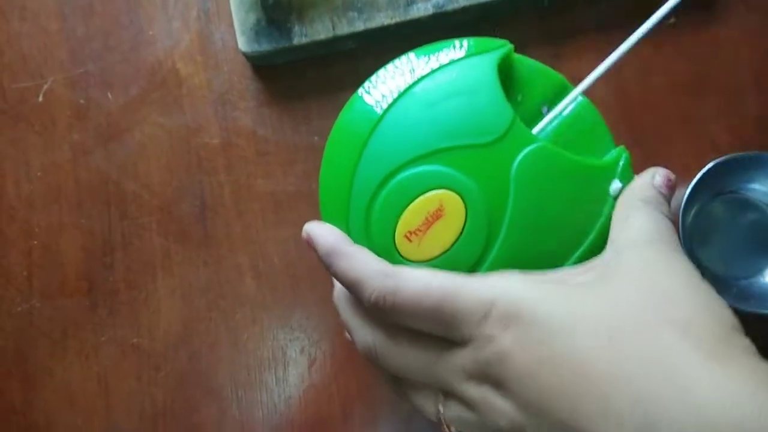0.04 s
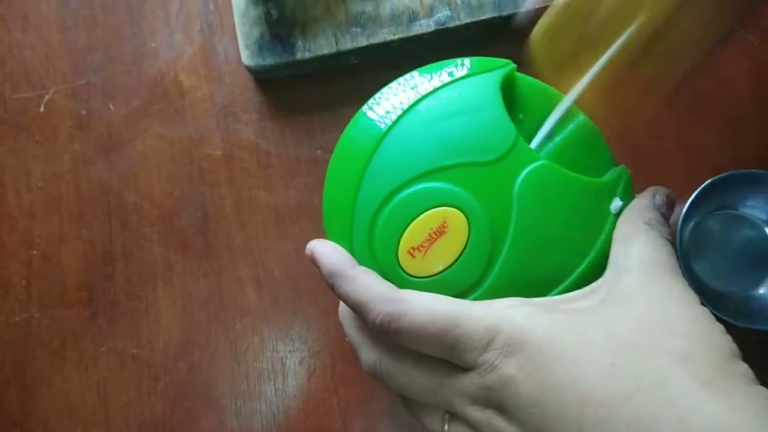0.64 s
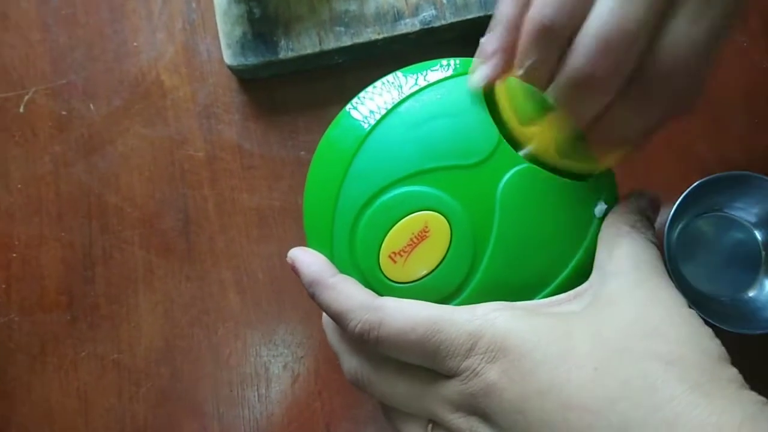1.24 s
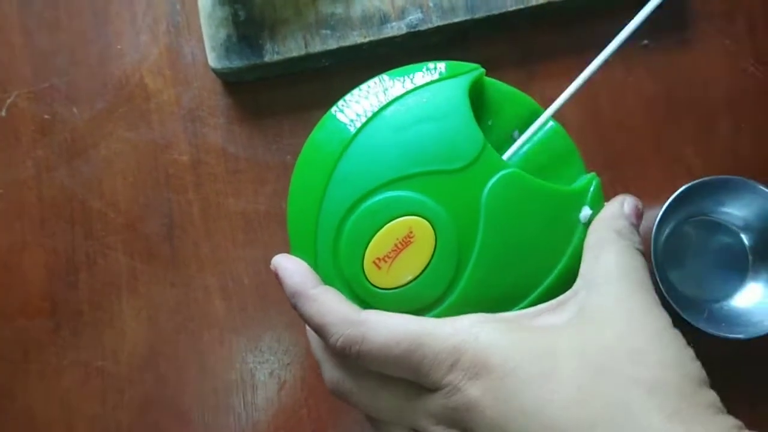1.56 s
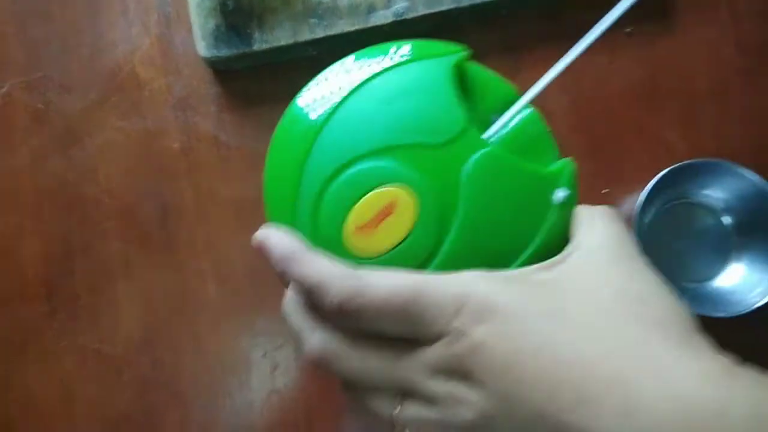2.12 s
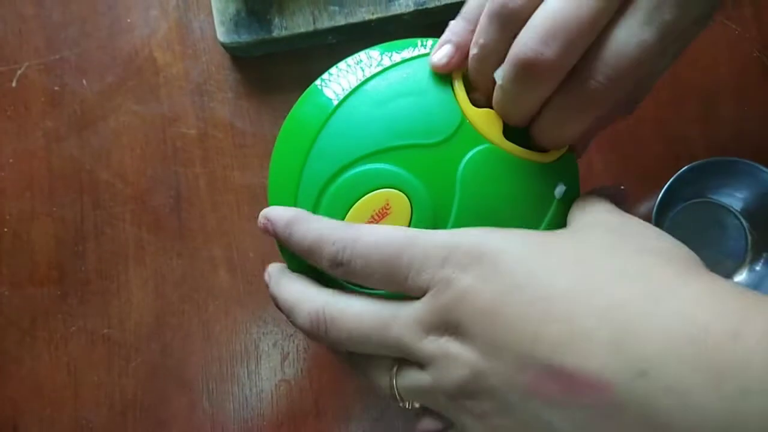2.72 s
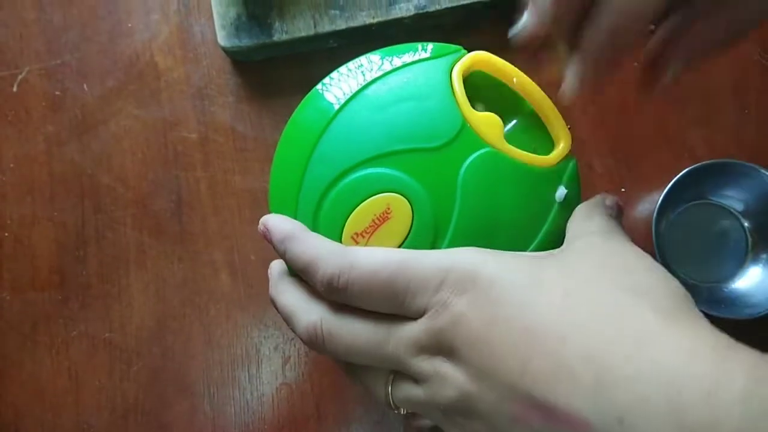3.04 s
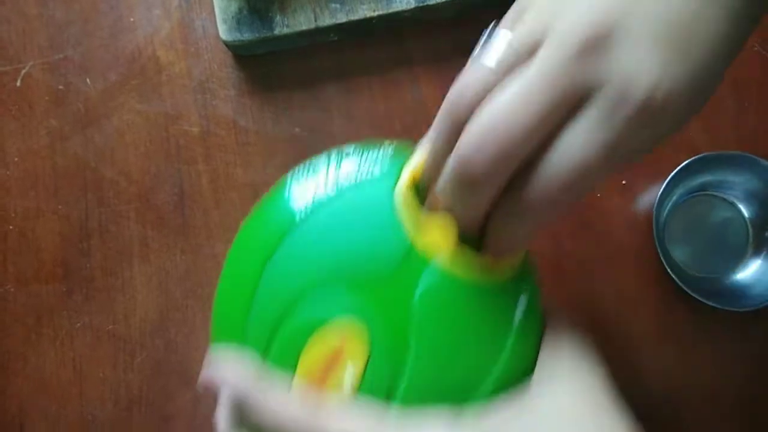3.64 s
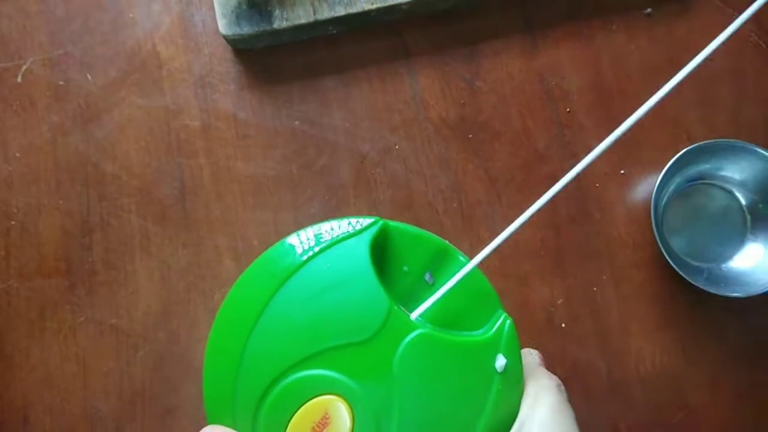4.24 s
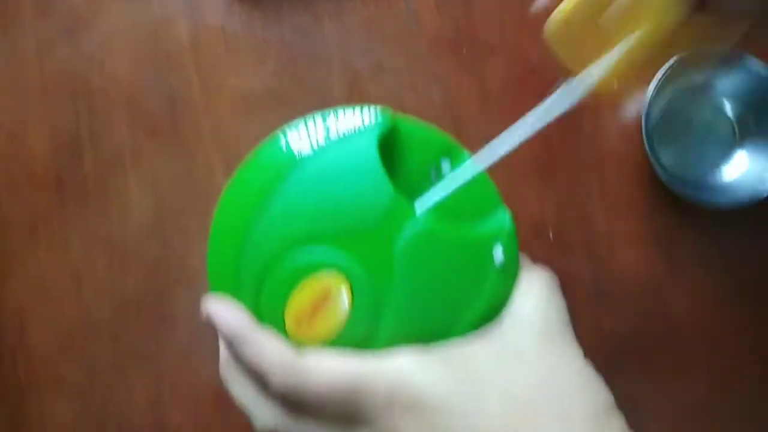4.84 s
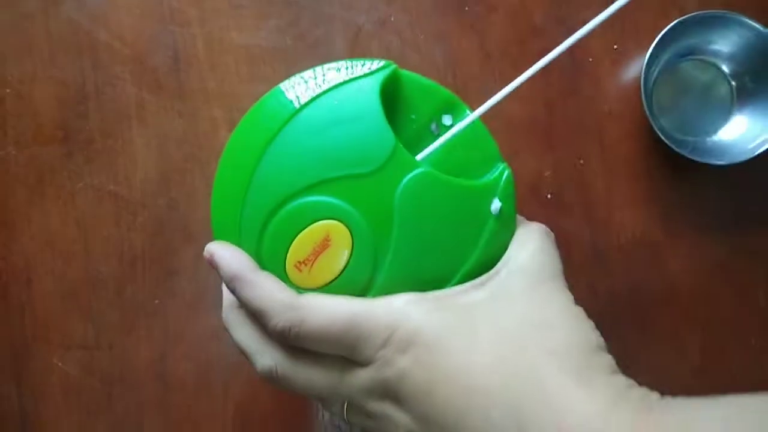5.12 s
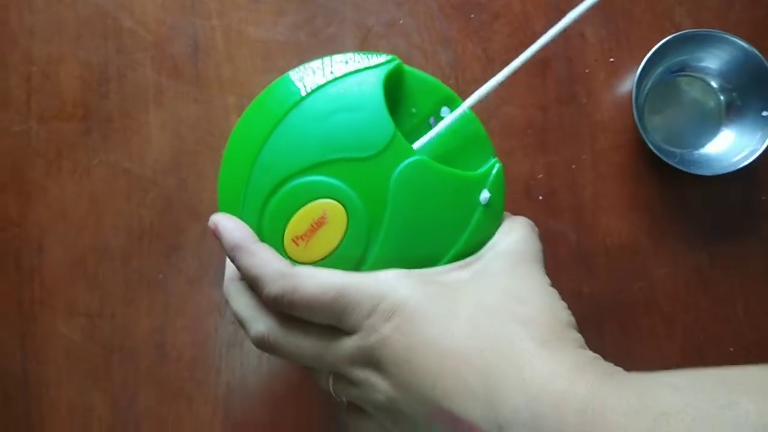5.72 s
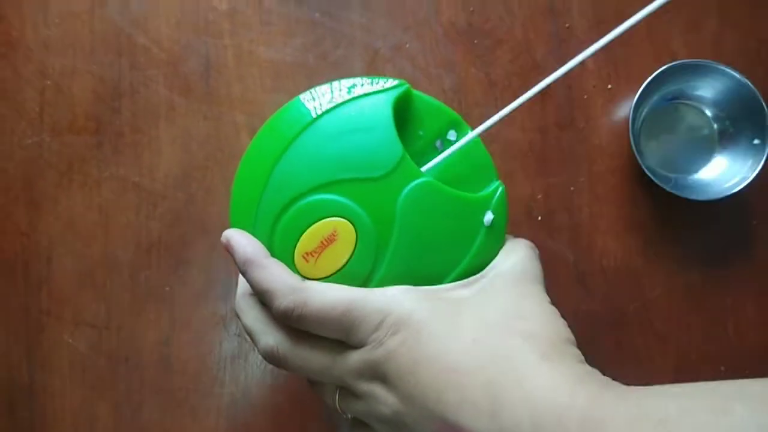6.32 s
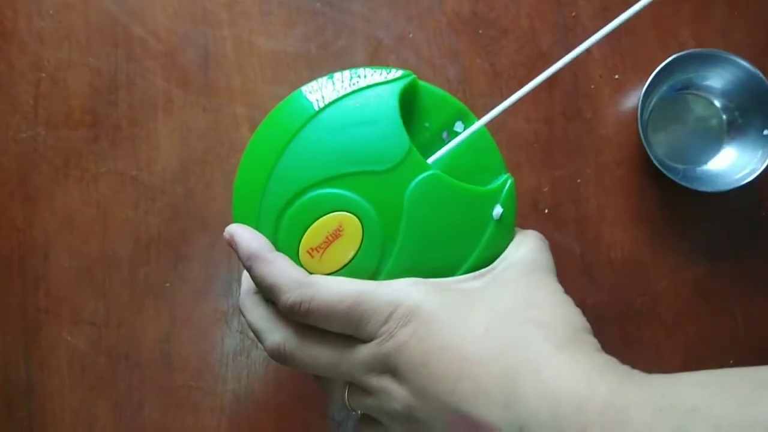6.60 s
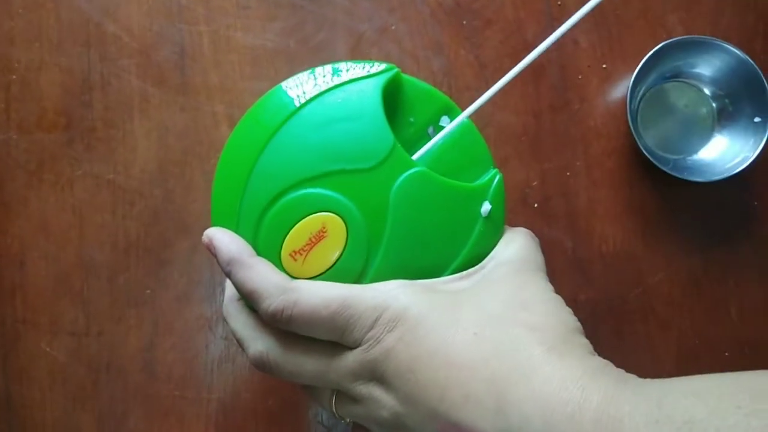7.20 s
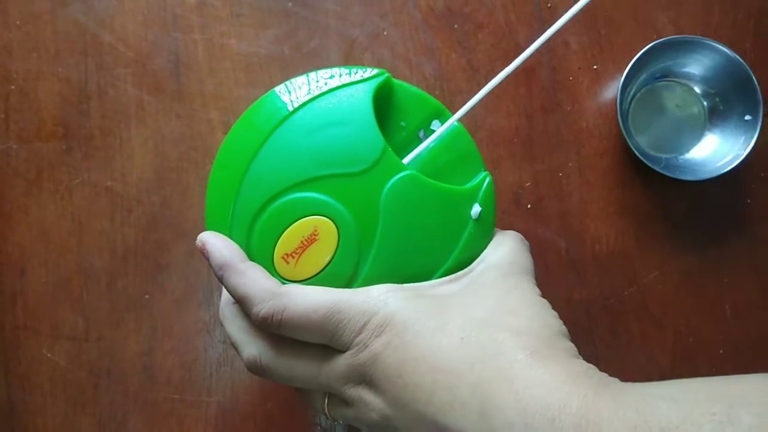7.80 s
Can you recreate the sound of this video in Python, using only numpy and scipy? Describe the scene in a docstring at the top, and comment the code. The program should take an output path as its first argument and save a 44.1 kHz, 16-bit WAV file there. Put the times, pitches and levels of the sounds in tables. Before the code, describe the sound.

Close, repeated pulls of a hand chopper: rattling crunches of vegetables alternate with the cord's raspy rewind, plastic clicks and light table knocks.

```python
"""In a small room, a plastic pull-cord vegetable chopper is worked on a wooden table, close by.
Each pull spins the blades through the vegetables, whose many small impacts crunch and excite the
resonances of the bowl. A spring then winds the cord back with a bright ratchet rasp. Handle, pawl and
lid click in damped free vibration. In a pause fingers touch the handle and the bowl knocks on the table."""
import sys
import numpy as np
from scipy import signal
from scipy.fft import rfft, irfft
from scipy.io import wavfile

SR = 44100
rng = np.random.default_rng(int(sys.argv[2]) if len(sys.argv) > 2 else 0)


def unload_audio(sound):
    """Save the sound as a 16-bit wav file, at the path given as the first command line argument."""
    columns = np.transpose(np.atleast_2d(sound))
    # keep every value between -1 and 1, then stretch to whole-number steps
    steps = np.round(np.clip(columns, -1, 1) * 32767)
    wavfile.write(sys.argv[1], SR, steps.astype(np.int16))


N = 351036
TIME = np.arange(N) / SR

# rewinds of the cord: t/s, spin-up/s, delay until braking/s, braking/s, rattle/dB, rasp/dB, pawl click/dB
REWIND_STROKES = [(0.055, .02, 0.14, 0.039, -24, -18.5, -10), (.57, .04, .135, 0.096, -24.5, -17.5, -15.5),
                  (1.103, 0.046, .135, .1, -24.5, -18.5, -17.5),
                  (1.631, 0.046, .14, 0.068, -24.5, -18, -16), (2.415, .16, .19, 0.15, -27.5, -23.5, -27),
                  (4.426, .05, 0.15, 0.11, -26, -19.5, -17), (5.22, .02, .15, .105, -27, -21, -14),
                  (5.899, .075, .175, 0.11, -24, -18, -16.5), (6.607, .055, .195, 0.081, -25, -18, -16.5),
                  (7.279, 0.063, 0.16, .11, -25, -18, -15), (7.912, .03, 0.17, .11, -25.5, -18.5, -20)]
# resonances of the filled bowl: f/Hz, bandwidth/Hz, lift/dB
BOWL_RESONANCES = [(176, 30, 8.5), (209, 54, -5), (259.4, 52, 6), (370, 70, 5), (435, 30, 0.5),
                   (489, 8.9, 8), (626, 280, 3), (1250, 73, 0.5), (1822, 67, 2)]
# modes of the plastic lid: f/Hz, level/dB, t60/s
LID_MODES = [(459, -8.5, 0.044), (741, -5, 0.033), (1230, -7.5, 0.037), (1810, -9, 0.026),
             (2180, -3.5, 0.017), (2740, -11.5, 0.0034), (3450, -5, 0.0075), (4090, -24, .009)]
# stereo balance of chopping and handling: f/Hz, left minus right/dB
PULL_BALANCE = [(100, -0.5), (250, 1.5), (400, 1), (700, -1.5), (1400, -4), (2500, -7), (4400, -2),
                (8000, -2.5), (12000, 6.5), (15000, 0)]
# stereo balance of rewinds and clicks: f/Hz, left minus right/dB
REWIND_BALANCE = [(100, -3.5), (330, 2.5), (700, -1.5), (1400, -4.5), (2500, -4.5), (4400, -2),
                  (6500, -0.5), (8400, -5), (11500, 5), (15000, 6)]


def undb(db):
    """Amplitude ratio of a level in decibels."""
    return 10 ** (np.asarray(db) / 20)


def unit(x):
    """Normalisation to an rms of one."""
    return x / np.sqrt(np.mean(x ** 2))


def convolve(x, response):
    """Convolution: the output of a linear system with this impulse response."""
    return signal.oaconvolve(x, response)[:len(x)]


def band(x, lo_hz, hi_hz, order=3):
    """Butterworth band-pass."""
    edges = [lo_hz, min(hi_hz, SR / 2 - 1)]
    return signal.sosfilt(signal.butter(order, edges, "band", fs=SR, output="sos"), x)


def colour(x, spectrum, resonances=(), size=8192):
    """Minimum-phase filter through (f/Hz, level/dB) points, with resonance peaks on top."""
    hz = np.maximum(np.fft.rfftfreq(size, 1 / SR), 1)
    points_hz, points_db = np.transpose(spectrum)
    db = np.interp(np.log(hz), np.log(points_hz), points_db)
    for centre, width, lift in resonances:
        db = db + lift / (1 + (2 * (hz - centre) / width) ** 2)
    cepstrum = irfft(np.log(undb(db)))
    cepstrum[1:size // 2] *= 2  # folding the cepstrum makes the response causal
    cepstrum[size // 2 + 1:] = 0
    return convolve(x, irfft(np.exp(rfft(cepstrum)))[:size // 2])


def fade(t60):
    """Exponential decay, lasting until it is 60 dB down."""
    return np.exp(-np.log(1000) * np.arange(int(t60 * SR) + 2) / (t60 * SR))


def diffuse(t60):
    """Diffuse response: dense random arrivals, decaying, of unit energy."""
    decay = fade(t60)
    tail = decay * rng.standard_normal(SR)[:len(decay)]
    return tail / np.linalg.norm(tail)


def ping(hz, t60):
    """Free vibration of one damped mode."""
    decay = fade(t60)
    return decay * np.sin(2 * np.pi * hz * TIME[:len(decay)])


def ring(modes, detune):
    """Modal sum of a struck object, with a peak of one; the pitches vary from blow to blow."""
    out = np.zeros(SR // 2)
    for hz, db, t60 in modes:
        decay = fade(t60)[:len(out)]
        detuned_hz = hz * (1 + detune * rng.standard_normal())
        out[:len(decay)] += undb(db) * decay * np.cos(2 * np.pi * detuned_hz * TIME[:len(decay)])
    return out / np.abs(out).max()


def add(track, start, sound):
    """Superposition of a sound on a track at a time in seconds."""
    i = max(int(start * SR), 0)
    track[i:i + len(sound)] += sound[:N - i]


def wander(per_second):
    """Random modulation, interpolated between knots, with an rms of one."""
    knots = rng.standard_normal(4000)
    return unit(np.interp(TIME * per_second, np.arange(len(knots)), knots))


def grains(per_second, spread_db):
    """Shot noise: independent tiny impacts of unequal size."""
    hit = rng.random(N) < per_second / SR
    size = undb(spread_db * np.clip(rng.standard_normal(N), -2, 2))
    return unit(hit * size * rng.choice([-1, 1], N))


def teeth(hz, jitter, spread_db):
    """Quasi-periodic impulse train: one impulse per passing tooth or blade, uneven in time and size."""
    stretch, size = rng.standard_normal((2, N))
    at = np.flatnonzero(np.diff(np.floor(np.cumsum(hz) / SR)))
    late = jitter * stretch[:len(at)] * SR / hz[at]
    out = np.zeros(N)
    out[np.clip(at + late.astype(int), 0, N - 1)] = undb(spread_db * np.clip(size[:len(at)], -2, 1))
    return out


def microphones(x, balance, scatter_t60, scatter_db):
    """Decorrelation: sound from shifting contacts scatters off table and hands, widening the treble."""
    # stereo width: f/Hz, side gain/dB
    width = [(40, 3.5), (140, -13.5), (350, -13), (700, -5.5), (1400, 0.5), (4000, 1.5), (16000, 2.5)]
    near, across, around = (convolve(x * wander(70), diffuse(scatter_t60)) for _ in range(3))
    mid = x + undb(scatter_db) * band(near, 1600, 18000, order=1)
    side = colour((across + around) / np.sqrt(2), width)
    return np.array([colour(mid + sign * side, [(hz, sign * db / 2) for hz, db in balance], size=512)
                     for sign in (1, -1)])


def air():
    """Ambient noise: faint, steady and partly coherent between the two channels."""
    # spectrum of the room's noise: f/Hz, level/dB
    spectrum = [(18, -40.5), (60, -18.5), (110, -20.5), (174, -3), (240, -8), (330, -20.5), (700, -15),
                (1300, -21.5), (3200, -26.5), (6000, -30.5), (11100, -25.5), (16000, -36.5)]
    shared, left, right = (unit(colour(rng.standard_normal(N), spectrum)) for _ in range(3))
    return undb(-71.5) * (0.76 * shared + .6 * np.array([left, right]))


def pull_envelopes():
    """Power laws: drumming and crunch follow the blade speed, which surges and sinks to a coast."""
    # pulls of the cord: t/s, speeding up/s, slowing down/s, drumming/dB, crunch/dB
    pulls = [(-.2, .12, 0.13, -22.5, -21), (0.308, 0.13, .12, -22, -20), (.855, 0.085, .17, -22, -20.5),
             (1.379, .115, 0.12, -21, -19), (2.05, 0.12, .145, -27, -23.5),
             (4.085, .175, 0.14, -24.5, -23.5), (4.865, .165, .15, -24.5, -24.5),
             (5.562, .16, .145, -22, -20), (6.28, 0.17, 0.12, -23.5, -21), (6.975, .16, .11, -24, -21),
             (7.599, 0.16, 0.12, -23, -21)]
    take_up_s, coast_s, coast_share = 0.023, .1, 0.16
    drum, crunch = np.zeros((2, N))
    for start, rise, fall, drum_db, crunch_db in pulls:
        end = start + rise + fall
        effort = np.sin(np.interp(TIME, [start, start + rise, end], [0, np.pi / 2, 0])) ** 1.3
        turning = np.interp(TIME, [start - take_up_s, start, end, end + coast_s], [0, 1, 1, 0])
        speed = turning * (coast_share + (1 - coast_share) * effort)
        drum += undb(drum_db) * speed ** .8
        crunch += undb(crunch_db) * speed ** 1.105
    return drum, crunch


def pieces(lo_hz, hi_hz, t60, spread_db, count=1100):
    """Impact excitation: hard pieces hit blades and wall, each ringing briefly at its own pitch."""
    track = np.zeros(N)
    for when, pitch, size in rng.random((count, 3)):
        hz = lo_hz * (hi_hz / lo_hz) ** pitch
        add(track, when * TIME[-1], undb(spread_db * size ** 2) * ping(hz, t60))
    return unit(track)


def chopping():
    """Source and filter: each blade pass is a cluster of cuts, and flung pieces drum on the bowl."""
    # spectrum of the chopping: f/Hz, level/dB
    spectrum = [(18, -63.5), (30, -37), (98, -17.5), (165, -1), (210, 0.5), (245, 0.5), (355, -1.5),
                (512, -3.5), (1810, -6.5), (2610, -13), (3220, -11), (5590, -18), (6720, -15),
                (12000, -18.5), (16000, -30)]
    drum, crunch = pull_envelopes()
    speed = np.sqrt(drum / drum.max())
    passes = unit(convolve(teeth(40 + 70 * speed, jitter=0.34, spread_db=1), fade(0.047)))
    cuts = unit(grains(per_second=900 + 2000 * speed, spread_db=-1.5) * (0.99 + .5 * passes))
    wet_hiss = grains(per_second=6300, spread_db=0.5)
    thuds = grains(per_second=600 + 700 * speed, spread_db=2.0)
    body = unit(band(colour(thuds, spectrum, BOWL_RESONANCES), 28, 800))
    cutting = band(colour(cuts, spectrum, BOWL_RESONANCES), 800, 4400)
    cutting += undb(-1.5) * band(colour(wet_hiss, spectrum), 4800, 18000)
    hits = pieces(lo_hz=800, hi_hz=2817, t60=0.009, spread_db=17)
    dry = undb(-0.8) * drum * body + crunch * (undb(-4.5) * unit(cutting) + undb(-11.0) * hits)
    return microphones(dry, PULL_BALANCE, scatter_t60=0.005, scatter_db=-3.5)


def rewind_envelopes():
    """Exponential growth and decay: the spring jerks the spool up to speed, then the hand brakes it."""
    spin_up_db_per_s, rattle_brake_db_per_s, rasp_brake_db_per_s = 85, 98.5, 170
    attack_s, rattle_release_s, rasp_release_s = .003, .03, .012
    rattle, rasp = np.zeros((2, N))
    t = TIME[:SR]
    for start, spin_up, brake_at, brake, rattle_db, rasp_db, _ in REWIND_STROKES:
        running = np.minimum(t / attack_s, 1) * undb(-spin_up_db_per_s * np.maximum(spin_up - t, 0))
        braked_s = np.clip(t - brake_at, 0, brake)
        stopped_s = np.maximum(t - brake_at - brake, 0)
        for track, db, db_per_s, release_s in (
                (rattle, rattle_db, rattle_brake_db_per_s, rattle_release_s),
                (rasp, rasp_db, rasp_brake_db_per_s, rasp_release_s)):
            add(track, start, running * undb(db - db_per_s * braked_s) * np.exp(-stopped_s / release_s))
    return rattle, rasp


def rewinding():
    """Friction and repeated impact: the cord scrapes through the eyelet as the pawl skips its teeth."""
    # spectrum of the rasp: f/Hz, level/dB
    rasp_spectrum = [(2000, -19), (3000, -9), (4100, -4), (4930, -8), (5600, -11.5), (7620, -2), (8700, -1),
                     (9600, -5), (11900, -3.5), (15100, -15), (16000, -15)]
    # resonances of spring and spool: f/Hz, bandwidth/Hz, lift/dB
    spool_resonances = [(5750, 860, 3), (6900, 98, 9), (7900, 220, 0.5), (8630, 640, -0.5), (8650, 250, 1),
                        (9660, 440, -5), (9970, 160, 5), (12500, 320, 3)]
    # spectrum of the rattling housing: f/Hz, level/dB
    housing_spectrum = [(18, -58), (30, -15), (108, -17), (164, -6.5), (211, -8), (356, -2.5), (439, -6),
                        (1040, -10), (1790, -7.5), (2070, -10), (3570, -13), (4050, -10.5), (4500, -12.5),
                        (5850, -52.5), (9900, -120)]
    rattle, rasp = rewind_envelopes()
    speed = np.sqrt(rasp / rasp.max())
    pawl = teeth(70 + 170 * speed, jitter=.2, spread_db=7.0)
    bursts = unit(convolve(pawl, fade(.015)))  # every skip sets off a burst of scraping
    scrape = grains(per_second=18000, spread_db=1.5) * (1 + .45 * bursts)
    # the steel spring rings along; a random crossfade shifts its many close modes
    coil = 2 * wander(7.2)
    spring = np.cos(coil) * convolve(scrape, diffuse(0.043))
    spring += np.sin(coil) * convolve(scrape, diffuse(.05))
    bright = unit(band(colour(scrape + undb(-9) * spring, rasp_spectrum, spool_resonances), 3700, 19000))
    shaking = .5 * unit(pawl) + grains(per_second=3500, spread_db=-2.5)
    body = unit(band(colour(shaking, housing_spectrum, BOWL_RESONANCES), 13, 4100))
    dry = undb(-2.5) * rasp * bright + undb(1.64) * rattle * body
    return microphones(dry, REWIND_BALANCE, scatter_t60=0.04, scatter_db=-2.0)


def clicking():
    """Impact and rebound of hard plastic: the struck part and the lid ring under a bright snap."""
    # clicks of handle, pawl and lid: t/s, level/dB, treble snap/dB, f/Hz of the strongest ring
    clicks = [(.226, -10.5, -32.5, 2420), (.232, -7.5, -27, 1810), (.287, -11, -18, 2200),
              (.467, -5, -38, 1540), (.786, -20, -17, 1860), (.826, -7.5, -11.5, 1790),
              (1.29, -5, -12, 2460), (1.3, -12.5, -13.5, 1920), (1.356, -13.5, -11.5, 1306),
              (1.872, -7, -17, 2310), (1.902, -10, -15, 1790), (2.017, -11, -21, 1300),
              (2.025, -13.5, -19.5, 1700), (2.364, -23, -39, 1750), (2.398, -21.5, -39, 900),
              (2.732, -14.5, -17, 1900), (2.746, -12.5, -19, 2560), (2.752, -10.5, -9, 1216),
              (2.771, -17.5, -14.5, 2280), (3.544, -30, -46, 1300), (4.019, -39, -44, 1300),
              (4.031, -28, -30.5, 3100), (4.058, -21, -29, 1850), (4.074, -12.5, -11.5, 1830),
              (4.66, -12, -18, 2080), (4.665, -7.5, -33, 2708), (4.716, -14.5, -14.5, 1270),
              (4.821, -16, -26, 1700), (4.828, -12, -33, 1890), (5.161, -30, -52, 1019),
              (5.464, -13, -36, 2165), (5.52, -10.5, -25.5, 2460), (5.538, -16.5, -28, 1520),
              (6.176, -18, -20, 1104), (6.218, -10, -19, 2480), (6.249, -12.5, -14.5, 1530),
              (6.339, -14.5, -16, 1370), (6.927, -11, -24, 2000), (6.947, -17, -15, 1670),
              (6.957, -18, -26, 770), (7.445, -16, -30, 2191), (7.583, -15, -15, 1943),
              (7.59, -15.5, -18, 1162), (7.711, -9, -23, 3130), (7.872, -14.5, -37, 1897)]
    # spectrum of the snap: f/Hz, level/dB
    snap_spectrum = [(1500, -25), (4000, -6), (5500, -9.5), (8000, -5.5), (10000, -8), (12500, -9),
                     (16000, -21.5)]
    pawl_releases = [(start, db, db, 1410) for start, *_, db in REWIND_STROKES]
    track = np.zeros(N)
    for start, db, snap_db, hz in clicks + pawl_releases:
        add(track, start, undb(db + 6.0) * band(ring(LID_MODES, detune=.11), 250, 5000, order=2))
        add(track, start, undb(db - 4.0) * ping(hz, t60=0.011))
        rebound = start + rng.uniform(.002, 0.0047)
        add(track, rebound, undb(db + 0.5) * band(ring(LID_MODES, detune=.11), 250, 3500, order=2))
        snap = colour(np.pad(diffuse(0.018), (0, SR // 50)), snap_spectrum, size=512)
        add(track, start, undb(snap_db + 26.5) * snap)
    return microphones(track, REWIND_BALANCE, scatter_t60=0.066, scatter_db=-10.5)


def knocking():
    """Damped free vibration: the bowl's foot bumps the table, both boom briefly and the lid shivers."""
    # knocks of the bowl: t/s, level/dB, relative thud of the table top/dB
    knocks = [(2.018, -13, -5), (2.028, -33, -16), (2.752, -25, -18), (3.248, -55.5, -20),
              (3.275, -54, -20), (3.537, -25.5, -23), (3.546, -25, -20), (3.585, -44, -22),
              (3.614, -54, -22), (3.84, -22.5, -21), (3.872, -32, -20.5), (3.915, -23.5, -5),
              (3.975, -39, -18), (4.025, -37, -16), (4.075, -23.5, -30), (5.536, -24, -17),
              (6.251, -19, -22), (6.951, -21, -22), (7.591, -16.5, -28)]
    # modes of the bowl standing on the table: f/Hz, level/dB, t60/s
    standing_modes = [(126.6, -4.5, 0.22), (171.5, 10, 0.067), (209, 0, 0.092), (263.5, 3, 0.14),
                      (352, 0, 0.17)]
    track = np.zeros(N)
    for start, db, thud_db in knocks:
        add(track, start, undb(db + 4.5) * band(ring(standing_modes, detune=0.013), 130, 357, order=4))
        add(track, start, undb(db + thud_db) * band(ping(hz=110, t60=0.058), 99, 260, order=2))
        add(track, start, undb(db + 1) * band(diffuse(0.074), 607, 1800, order=2))
    return track


def touching():
    """Frictional excitation: fingers rub the handle and keep feeding a resonance, blurring its ring."""
    # touches of the handle: t/s, level/dB, f/Hz, t60/s
    touches = [(3.06, -62, 3320, 0.28), (3.136, -52.5, 1275, 0.28), (3.249, -42, 1370, 0.087),
               (3.263, -44, 1330, 0.077), (3.263, -51, 3800, 0.063), (3.456, -41, 970, 0.014),
               (3.519, -44, 3200, .04)]
    track = np.zeros(N)
    for start, db, hz, t60 in touches:
        rub = unit(band(rng.standard_normal(SR // 2), hz * 0.903, hz * 1.01, order=2))
        decay = fade(t60)
        add(track, start, undb(db - 9.5) * decay * rub[-len(decay):])
        add(track, start, undb(db + 7) * band(ring(LID_MODES, detune=0.054), 680, 1300, order=2))
    return track


def room(dry, t60, wet_db):
    """Reverberation of a small hard-walled room; its long waves reach both microphones alike."""
    walls = [(60, -10), (200, 6.5), (1000, -3.5), (4000, -2), (9000, -1.5), (16000, -5.5)]  # f/Hz, level/dB
    gap = np.zeros(int(.007 * SR))
    left, right = (colour(convolve(channel, np.r_[gap, diffuse(t60)]), walls) for channel in dry)
    mid = (left + right) / 2
    side = band((left - right) / 2, 550, 20000, order=1)
    return dry + undb(wet_db) * np.array([mid + side, mid - side])


def scene():
    """Superposition of the chopper's direct sound, its reverberation and the ambient noise."""
    chopper = chopping() + rewinding() + clicking()
    handling = microphones(touching() + knocking(), PULL_BALANCE, scatter_t60=0.045, scatter_db=1.5)
    return room(chopper + handling, t60=0.43, wet_db=-9) + air()


def record(dry):
    """Soft saturation rounds the highest peaks; a steep low-pass cuts the top."""
    low_pass = signal.ellip(10, .2, 80, 15900, fs=SR, output="sos")
    return signal.sosfilt(low_pass, 1.047 * np.tanh(dry / 1.174))


dry = scene()
out = record(dry)
unload_audio(out)
```